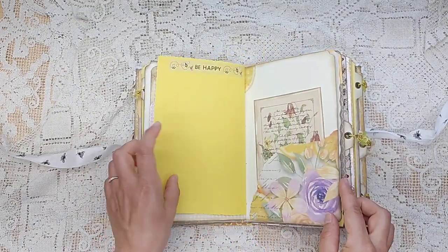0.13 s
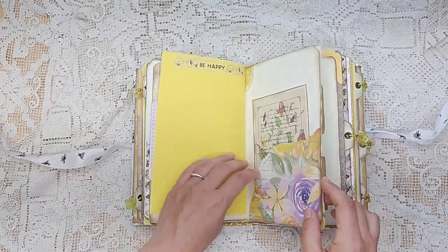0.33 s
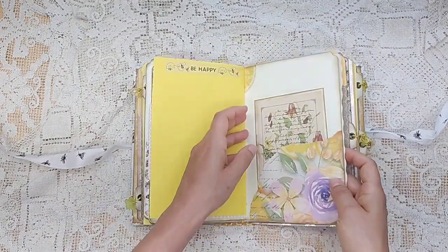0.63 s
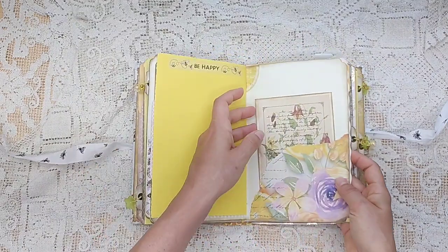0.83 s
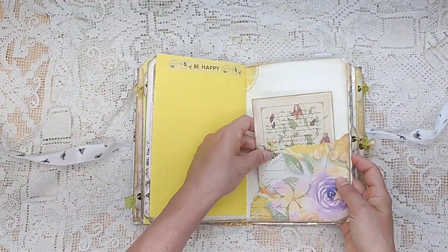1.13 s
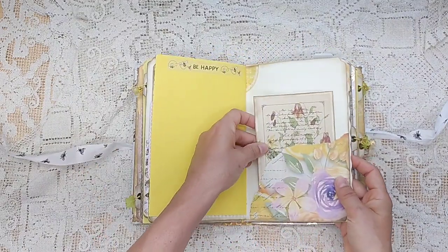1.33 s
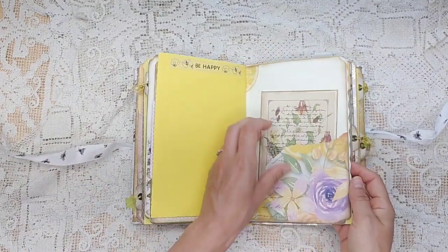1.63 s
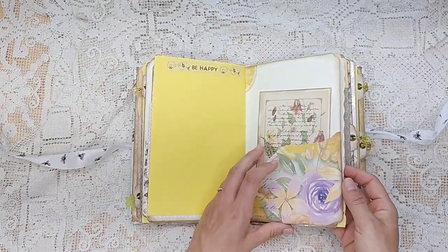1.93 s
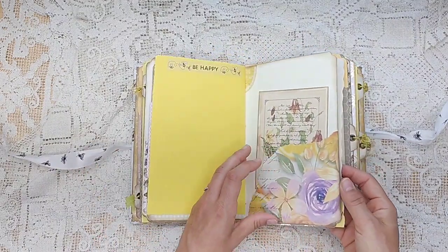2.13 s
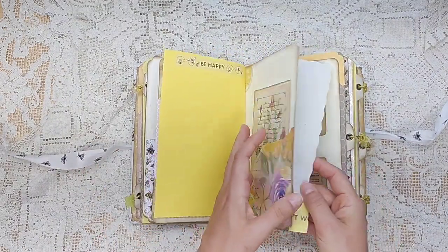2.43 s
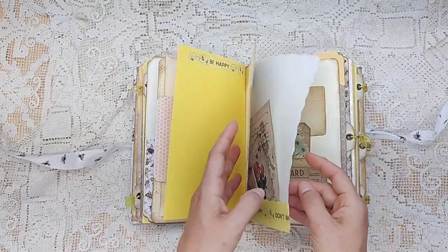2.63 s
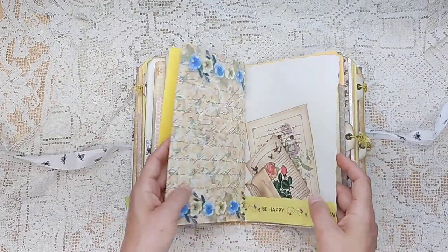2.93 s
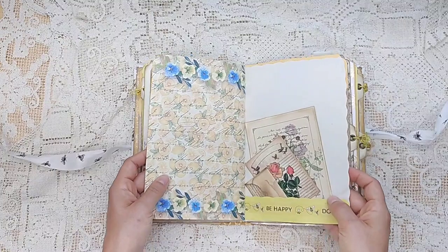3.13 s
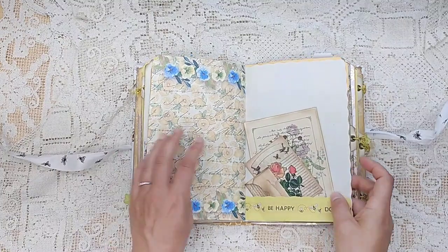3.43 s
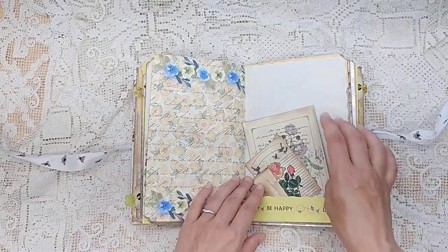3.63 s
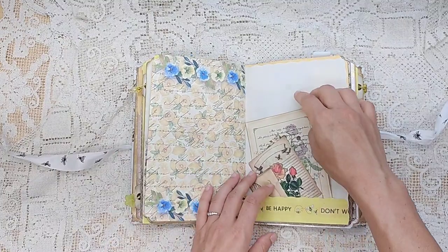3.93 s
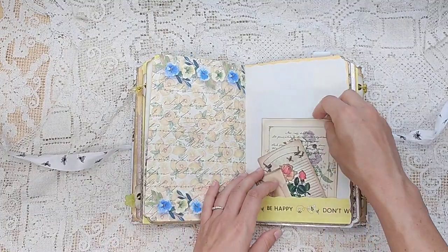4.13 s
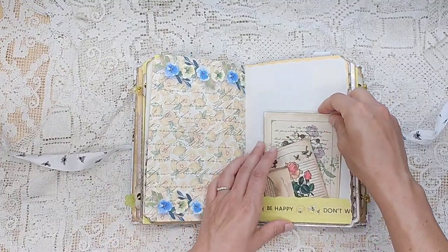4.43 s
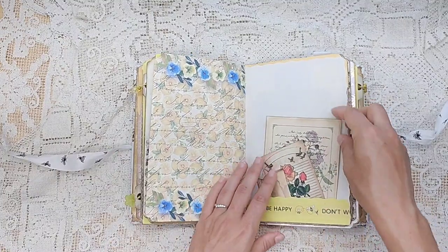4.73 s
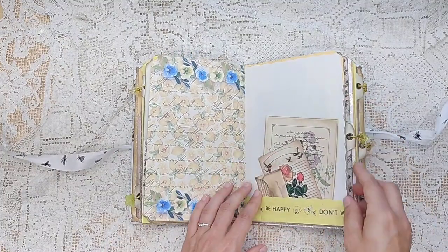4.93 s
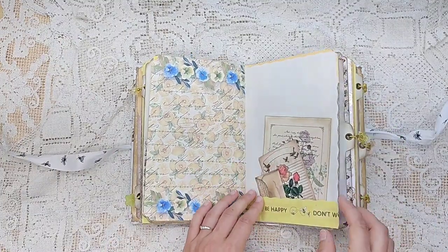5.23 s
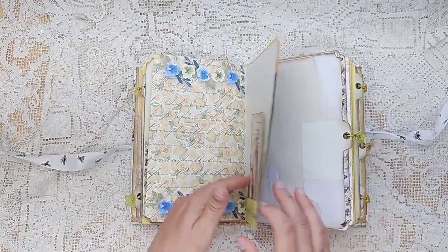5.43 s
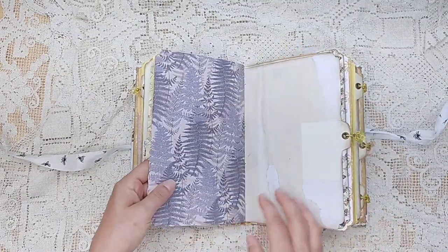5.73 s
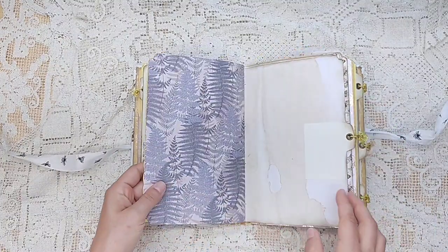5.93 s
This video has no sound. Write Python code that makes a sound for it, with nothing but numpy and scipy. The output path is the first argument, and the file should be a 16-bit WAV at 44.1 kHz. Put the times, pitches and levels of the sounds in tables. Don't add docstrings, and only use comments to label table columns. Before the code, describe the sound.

Close stereo phone pickup of thick, rough handmade pages on a cloth-covered table in a small soft room with faint low hum. From 0 to 0.9 seconds, fingertips rub and edges rasp, with a ringing squeaky slip at 0.3, scuffs and stiff snaps, and a low wobble of the nudged stand around 0.4 to 0.6. At 1.0 a stiff card flicks out with a hard, woody mid-range knock, followed by scrapes. Softer rubbing continues from 1.5, with small ticks at 2.0 and snaps at 2.3 to 2.45. At about 2.6 pages whip past the thumb in the loudest moment, a bright swish with dense crackle, over in a tenth of a second. Lighter scuffs and snaps follow from 2.8 to 3.6. From 3.7 to 5 a card slides quietly with sparse clicks, one snap near 4.8. After a near lull, a gentle turn brings soft snaps around 5.45 to 5.7, fading by 6.

```python
import sys
import numpy as np
from scipy import signal
from scipy.fft import rfft, irfft, next_fast_len
from scipy.io import wavfile
from scipy.ndimage import uniform_filter1d

SR = 44100
rng = np.random.default_rng(int(sys.argv[2]) if len(sys.argv) > 2 else 0)


def makeup_ratio(level_db):
    decades = np.asarray(level_db, float) / 20
    return 10 ** decades


def pcm_store(signal):
    levels = np.round(np.clip(np.atleast_2d(signal), -1, 1) * 32767)
    wavfile.write(sys.argv[1], SR, levels.astype(np.int16).T)


N = 268877
T = np.arange(N) / SR
F = np.fft.rfftfreq(next_fast_len(N), 1 / SR) + 1e-3

# peak in seconds [s], rise
# over 20 dB [s], fall over 20 dB [s], edge rasp level [dB], thrum of the page stack over the rasp [dB].
FINGERTIPS = [(.108, 0.08, -0.26, -46.5, -37), (.67, 0.16, 0.23, -50.5, -15.5),
              (1.57, 0.08, 0.18, -53.5, -8.5), (1.615, 0.08, 0.08, -54.5, -15),
              (1.755, -0.02, 0.1, -60, -4.5), (1.807, 0.2, 0.15, -63.5, -4.5),
              (2.077, 0.08, -0.07, -58, -3.5), (2.15, -0.2, -0.5, -72.5, -16),
              (2.91, -0.33, -0.5, -62, -10), (3.157, 0.06, -0.27, -56.5, -6), (3.3, -0.25, -0.5, -71, -10),
              (3.364, 0.06, 0.1237, -49, -7), (3.41, 0.11, 0.1, -54.5, -5), (3.675, 0.8, 0, -63, -4),
              (3.75, 0.19, 0.186, -68, -2), (4.0, 0.15, 0.54, -69.5, -1), (4.105, 0.11, 0.077, -64, -4),
                (4.26, 0.58, .022, -63, -12.5), (4.609, 0.057, 0.052, -60, -6.5),
                (4.679, 0.038, 0.052, -69.5, -3), (4.876, 0.23, 0.014, -63, -9.5),
                (4.978, 0.156, 0.15, -65, -1.5), (5.42, 0.032, 0.2, -71, -15),
                (5.466, 0.068, 0.043, -65.5, -0.5), (5.49, .08, .04, -71, -15.5),
                (5.545, 0.035, 0.056, -72.5, -4), (5.615, 0.11, 0.19, -67, -5),
                (5.709, 0.23, 0.11, -69.5, 0.5), (5.828, 0.087, 0.183, -65.5, -6.5),
                (6.041, 0.036, 0.038, -82, -2)]
# [s, s, s, dB, dB].
SHEET_STROKES = [(.305, 0.075, 0.1, -56.5, -6), (.542, 0.19, 0.12, -53.5, -11),
                 (.816, 0.17, 0.061, -64, 11), (.845, .04, 0.12, -57, -2), (.985, .025, 0.066, -63, 2.5),
                 (1.035, 0.017, 0.34, -57, -9), (1.291, .08, 0.15, -58, -6.5),
                 (1.43, 0.19, 0.64, -68.5, -8), (1.667, .1, 0.1, -59.5, -0.5),
                 (2.41, .015, 0.15, -65.5, -4), (2.46, 0.051, 0.6, -61.5, -2.5), (2.54, .3, 0.15, -66, -5),
                 (2.594, 0.29, .05, -54.5, -6), (2.616, 0.011, 0.045, -39.5, -7.5),
                 (2.888, 0.022, 0.089, -63, -0.5), (3.09, .25, 0.33, -68.5, 1),
                 (3.182, .021, 0.049, -67.5, 3), (3.27, .05, 0.29, -65, 3.5),
                 (5.176, 0.044, 0.026, -95, 22), (5.975, .05, 0.14, -85, 13.5)]
# [s, s, s, dB, dB].
EDGE_STROKES = [(.01, 0.07, .2, -58, -16), (.06, 0.12, 0.12, -51, -20.5), (.146, 0.05, 0.037, -44.5, -10.5),
                (.355, 0.043, 0.19, -47, -27), (.43, 0.06, 0.049, -56.5, -3.5),
                (1.08, 0.073, 0.11, -49.5, -8.5), (1.15, 0.11, 0.037, -48.5, -3.5),
                (2.0, .08, 0.37, -70.5, -14.5), (2.28, 0.09, .1, -73.5, -2.5),
                (2.335, 0.05, 0.016, -66, -5), (2.83, 0.011, 0.074, -58, -6.5),
                (3.005, 0.1, 0.063, -64, -10), (3.45, .1, 0.105, -58, -6), (3.49, 0.13, 0.11, -55, -7),
                (3.54, 0.14, 0.069, -49, -8), (3.866, 0.039, 0.038, -59.5, -10.5),
                (4.352, 0.063, 0.066, -54, -12.5), (4.505, 0.079, 0.023, -59.5, -6),
                (4.79, 0.067, 0.1, -60, -7.5)]
# [s, s, s, dB, dB].
WHIP_STROKES = [
    (2.638, 0.035, 0.033, -24.5, -20.5),
    (2.695, 0.064, 0.038, -45, -27.5),
]
# scrape over rasp [dB], share of the thrum that the scrape follows
# [ratio], hiss over rasp [dB].
FINGERTIP_VOICE = (-2.5, 0.34, -0.72)
SHEET_VOICE = (0.63, .25, -6.5)
EDGE_VOICE = (-4.5, 0.25, -5.5)
WHIP_VOICE = (24.5, 1.24, -18)
AT_REST_DB = -97.5

# frequency [Hz], width [Hz], level [dB].
SHEET_MODES = [(630, 45, -10), (1130, 21, 2.5), (1500, 17, 7.5), (2038, 52, 2.5), (2190, 31, -13.5),
               (2660, 150, -3), (3750, 5, -0.5), (4245, 11, -21.5), (5700, 110, -16), (6810, 310, -0.5),
               (7200, 210, -12.5), (9000, 160, -16)]
# frequency [Hz], density [dB per Hz].
RUB_COLOUR = [(88, -39.5), (150, 2), (226, -7), (494, -13), (578, -6), (905, -14), (1360, -9), (2060, -2),
              (3100, -7), (6640, -11), (16000, -15)]
BAND_EDGES_HZ = [280, 1200, 3200, 7000, 15000]
PATCH_SHARE_DB = [0, 3, 4, -1]

# start in seconds [s], peak level [dB], centre [Hz], decay time T60 [s].
SINGING = [(.292, -51, 1130, 0.2), (.317, -33.5, 2244, 0.25), (.328, -45, 4570, 0.15),
           (.488, -45.5, 2640, 0.13), (.841, -38, 6500, 0.044), (1.040, -51, 1580, 0.15),
           (1.067, -41, 1500, 0.23), (1.095, -50, 1560, 0.049), (1.629, -48, 588, 0.017),
           (2.066, -49.5, 6340, 0.05), (2.291, -31.5, 5660, 0.094), (2.418, -59, 5540, 0.047),
           (2.411, -43.5, 1260, 0.039), (2.826, -49, 7000, 0.058), (3.287, -47, 834, 0.098),
           (3.35, -38, 3800, 0.081), (4.234, -45, 7960, 0.043), (4.331, -51, 3600, 0.099),
           (4.6, -54, 7600, 0.077), (5.0, -51, 3990, 0.036)]
# [s, dB, Hz, s].
SCUFFS = [(.085, -34, 5670, 0.19), (.134, -37, 2140, 0.072), (.312, -38, 3600, 0.22),
          (.661, -39, 6470, 0.14), (.709, -43, 1940, 0.055), (.832, -45, 630, 0.077),
          (.903, -50, 553, 0.04), (1.143, -46, 1500, 0.12), (1.261, -51, 673, 0.12),
          (2.007, -40, 1196, 0.074), (2.505, -42, 3170, .17), (2.515, -45, 5610, 0.12),
          (2.548, -48, 4200, .13), (2.571, -40, 3960, 0.068), (2.994, -53, 3960, .08),
          (3.143, -57, 820, 0.045), (3.175, -50, 563, 0.04), (3.411, -42, 1080, 0.023),
          (3.533, -39.5, 3200, 0.06), (3.651, -55, 576, 0.051), (3.863, -68, 820, 0.058),
          (4.23, -60, 4040, .08), (4.498, -53.5, 1590, 0.032), (4.772, -60.5, 746, 0.035),
          (4.971, -50, 2035, 0.086), (5.422, -63.5, 1980, .041), (5.627, -49.5, 1707, 0.044),
          (5.839, -61.5, 1860, 0.11)]
# [s, dB, Hz, s].
FLIP = [
    (2.612, -28, 1290, 0.071),
    (2.619, -23.5, 7200, 0.11),
    (2.626, -19.5, 4280, 0.056),
    (2.622, -17, 2690, 0.079),
    (2.648, -26, 4000, 0.077),
]
# rise [s], width [octaves].
SINGING_SHAPE = (.0075, 0.19)
SCUFF_SHAPE = (0.0077, .62)
FLIP_SHAPE = (0.014, 0.59)

# start in seconds [s], peak level [dB], low ring [Hz],
# high ring [Hz], high ring over low ring [dB].
SNAPS = [(0.53, -36, 1460, 2190, 2.5), (0.774, -36, 670, 2020, -2.5), (0.799, -40, 680, 1980, -22),
         (1.115, -37, 1510, 1830, -21), (2.005, -42.5, 1140, 2000, -4), (2.295, -33, 1560, 3320, 8.5),
         (2.309, -36, 3300, 5600, -12), (2.414, -38.5, 560, 2640, 2), (2.44, -35, 1456, 2560, 1),
         (2.878, -44.5, 550, 1830, -2), (3.252, -49, 666, 2073, -5), (4.5, -46.5, 1012, 1946, -3),
         (4.672, -45.5, 1500, 4560, 8), (4.802, -36.5, 760, 1435, 3.5), (4.826, -44.5, 1160, 1790, -6),
         (5.163, -56.5, 567, 1814, 2), (5.456, -54.5, 435, 2080, -11), (5.536, -54, 370, 2960, 1),
         (5.629, -44.5, 553, 2100, 0.5), (5.68, -42, 590, 2100, 9), (5.981, -59, 365, 1650, 0.5)]
# [s, dB, Hz, Hz, dB].
PAGE_SNAPS = [
    (2.403, -32, 1300, 2520, 7.2),
    (3.142, -45, 711, 6500, 3),
    (3.236, -35, 653, 1870, 1.4),
]
SNAP_T60_S, PAGE_SNAP_T60_S = 0.04, 0.15

# start in seconds [s], peak level [dB], length of the push [s].
FLICK = (0.99, -16.5, .011)
# frequency [Hz], level [dB], decay time T60 [s].
CARD_RINGS = [(1546, 4.5, 0.022), (1560, -17, 0.086), (1830, -0.5, 0.035), (2100, 2, 0.034),
              (2533, 2, 0.033), (2783, -26, 0.08), (3600, -14, 0.04), (3960, -63, 0.35)]
# start in seconds [s], length [s], peak level [dB],
# note [Hz].
FOLDS = [(0.304, 0.069, -37.5, 3460), (0.997, 0.048, -38, 2294), (1.041, 0.068, -41, 1500),
         (1.072, 0.043, -50.5, 4430), (1.128, 0.048, -46, 1500), (1.137, 0.02, -46, 3770),
         (1.561, 0.063, -48.5, 4000), (1.579, 0.055, -47, 7060), (1.586, 0.048, -50, 1790),
         (2.294, 0.03, -50.5, 1490), (2.295, 0.032, -41, 4120), (2.408, 0.026, -51, 5750),
         (2.501, 0.15, -40, 3960), (2.497, 0.057, -43.5, 2900), (2.555, .05, -44, 5060),
         (2.55, 0.045, -44, 2770), (2.615, 0.036, -32, 1500), (2.754, 0.014, -62, 1450),
         (2.826, 0.035, -55.5, 3600), (2.608, 0.025, -34, 996), (2.9, 0.02, -59, 2820),
         (0.278, 0.13, -48, 4450), (3.24, 0.039, -45, 2100), (3.351, 0.051, -44, 5740),
         (3.533, 0.032, -45.5, 4140), (2.613, 0.014, -37, 527), (4.32, 0.038, -53, 3780),
         (0.656, 0.1, -51.5, 1500), (4.665, .025, -64.5, 7800), (5.584, 0.055, -60, 7450),
         (5.625, 0.02, -52.5, 4020), (6.032, 0.012, -68, 1206)]
# start in seconds [s], peak level [dB], frequency [Hz],
# length of ring [cycles].
TICKS = [(.1372, -41, 1910, 6), (.1455, -38.5, 2400, 4), (.315, -44, 2220, 5), (0.344, -39.5, 3400, 4),
         (0.6582, -43, 1500, 7), (.709, -47.5, 480, 4.6), (.774, -42.5, 2060, 27), (.8, -43, 646, 5),
         (.812, -44.5, 624, 8), (.835, -47, 554, 9), (1.1159, -40, 1570, 8), (2.009, -43, 1750, 14),
         (2.018, -38, 1150, 9), (2.031, -42, 1200, 10), (2.078, -50, 800, 4), (2.2955, -34.5, 3500, 3.3),
         (2.31, -48, 590, 6.7), (2.4038, -39.5, 2390, 2.3), (2.4155, -40, 510, 4), (2.4402, -32, 1470, 4),
         (2.447, -37.5, 1500, 7), (2.515, -40.5, 2980, 4), (2.5654, -40, 3950, 4), (2.5704, -38, 4050, 8),
         (2.602, -36.5, 1100, 12), (2.616, -30.5, 1020, 5), (2.6286, -19, 3100, 5.3),
         (2.6353, -18, 2630, 5), (2.641, -14.5, 3200, 4.4), (2.647, -17.5, 2250, 6),
         (2.654, -23.5, 2297, 6), (2.66, -22, 2150, 8), (2.682, -29, 2400, 6.6), (3.143, -47.5, 890, 4),
         (3.239, -43, 2010, 40), (3.178, -51, 560, 10), (3.264, -43.5, 750, 4), (3.354, -44, 620, 5),
         (3.384, -43.5, 620, 6), (3.415, -42, 1110, 6), (3.49, -44.5, 600, 5), (3.5365, -38, 3280, 6),
         (3.5635, -44.5, 600, 3.2), (4.5, -42, 1000, 3), (4.5035, -44, 1300, 4), (4.673, -53.5, 4750, 25),
         (4.82, -43.5, 1100, 5), (4.828, -46, 897, 4), (5.6308, -46, 450, 2.6), (5.681, -50, 600, 4),
         (5.692, -53, 700, 6)]

# time in seconds [s], left minus right [dB].
HANDS = [(0.0, 1), (0.8, -0.6), (1.71, 0.5), (2.1, -1.5), (2.8, -1), (3.02, 1), (3.14, -1.5), (4.3, 2.5),
         (6.1, -0.5)]
# frequency [Hz], left minus right [dB].
PORT_BALANCE = [(60, -5.5), (110, 8), (200, 1), (380, 1), (700, -3), (1290, -1), (2380, -1.5), (4400, -5),
                (8120, 3), (15000, 3.5)]
PORT_LAG, LAG_SCATTER = 3.24, 2.18
ECHO_S = [.00043, .00107, .0019, .0031]

# time in seconds [s], level [dB].
STAND = [(0.35, -88), (0.385, -60.5), (.41, -58), (0.432, -64), (0.455, -53), (.5, -60.5), (.53, -61),
         (0.58, -69), (0.646, -68.5), (0.675, -79)]
# start in seconds [s], level [dB], swing [Hz].
SETTLING = [
    (.765, -61, 34.1),
    (.93, -62.5, 40),
    (1.728, -57.5, 36),
    (1.828, -59, 40),
]
# frequency [Hz], density [dB per Hz].
HUM = [(12, -25.5), (25, -2.5), (50, -8), (125, -7.5), (200, -21.5), (400, -22.5), (1000, -27.5),
       (2000, -29.5), (4000, -34), (7500, -45.5), (11000, -39), (16000, -38)]


def unit(x):
    return x / np.sqrt(np.mean(x ** 2))


def table(rows, hz):
    f, v = np.transpose(rows)
    return np.interp(np.log(hz), np.log(f + 1), v)


def shape(x, gain):
    size = next_fast_len(N)
    return irfft(rfft(x, size) * gain, size)[..., :N]


def walk(rate):
    hold = int(SR / rate)
    steps = np.repeat(rng.standard_normal(N // hold + 1), hold)
    return 1.34 * uniform_filter1d(steps, hold)[:N]


def fibres(count, spread_db):
    size_db = spread_db * np.minimum(rng.exponential(size=count), 4)
    return unit(rng.standard_normal(count) * makeup_ratio(size_db))


def ring(x, hz, width):
    b, a = signal.iirpeak(min(hz, .45 * SR), hz / width, fs=SR)
    return signal.lfilter(b, a, x)


def patch(push, hz, octaves, modes_db):
    width = octaves * hz
    wide = ring(ring(ring(push, hz, width), hz, width), hz, 1.1 * width)
    spots = hz * 2 ** (.4 * octaves * np.clip(rng.standard_normal(3), -2, 2))
    narrow = 2.0 * ring(push, hz, hz / 40.0) + sum(ring(push, f, f / 9.0) for f in spots)
    return unit(wide) + makeup_ratio(modes_db) * unit(ring(narrow, hz, 2.0 * width))


def ports(x, place):
    size = next_fast_len(len(x))
    lag = PORT_LAG + LAG_SCATTER * place
    turn = np.exp(1j * np.pi * np.arange(size // 2 + 1) / size * lag)
    return irfft(rfft(x, size) * np.array([turn, 1 / turn]), size)[:, :len(x)]


def lay(out, k, db, burst, place):
    out[:, k:k + len(burst)] += ports(burst * makeup_ratio(db) / np.abs(burst).max(), place)


def add(out, s, db, burst):
    lay(out, int(s * SR), db, burst, rng.standard_normal())


def contact_db():
    power = np.full((4, N), makeup_ratio(2 * AT_REST_DB))
    kinds = [(FINGERTIPS, FINGERTIP_VOICE), (SHEET_STROKES, SHEET_VOICE),
             (EDGE_STROKES, EDGE_VOICE), (WHIP_STROKES, WHIP_VOICE)]
    for strokes, (scrape_db, share, hiss_db) in kinds:
        for s, rise, fall, db, thrum_db in strokes:
            rise, fall = max(rise, .012), max(fall, .012)
            near = slice(max(int((s - 3 * rise) * SR), 0), int((s + 3 * fall) * SR))
            swell_db = db - 20 * np.maximum((s - T[near]) / rise, (T[near] - s) / fall)
            bands_db = np.c_[[thrum_db, scrape_db + share * thrum_db, 0, hiss_db]]
            power[:, near] += makeup_ratio(2 * (swell_db + bands_db))
    return 10 * np.log10(power)


def rubbing(ring_db=0.0, flicker_db=1.24, patchy_db=4.5, sharpness=32.):
    levels = contact_db()
    modes = 1 + sum(makeup_ratio(ring_db + 0.9 * db) / (1 + 1j * (F - hz) / w) for hz, w, db in SHEET_MODES)
    shared, places = walk(55), 0
    for lo, hi, db, share_db in zip(BAND_EDGES_HZ, BAND_EDGES_HZ[1:], levels, PATCH_SHARE_DB):
        limits = np.sqrt((1 + (lo / F) ** 8) * (1 + (F / hi) ** 8))
        grain = shape(fibres((3, N), spread_db=2.5), makeup_ratio(table(RUB_COLOUR, F)) * modes / limits)
        flares = np.zeros((3, N))
        for k, hz in enumerate(np.geomspace(1.03 * lo, .95 * hi, num=15)):
            flares[k % 3] += makeup_ratio(patchy_db * walk(30)) * ring(grain[k % 3], hz, hz / sharpness)
        contact = unit(grain) + makeup_ratio(share_db) * unit(flares)
        flicker = flicker_db * (1.4 * shared + .5 * walk(60))
        places = places + 0.65 * unit(contact) * makeup_ratio(db + flicker)
    return sum(makeup_ratio(-3.0 * abs(k - 1)) * ports(x * makeup_ratio(1.6 * walk(180)), k - 1) for k, x in enumerate(places))


def slips(skirt_db=-22):
    out, t = np.zeros((2, N + SR)), np.arange(SR // 4) / SR
    kinds = [(SINGING, SINGING_SHAPE), (SCUFFS, SCUFF_SHAPE), (FLIP, FLIP_SHAPE)]
    for rows, (rise, octaves) in kinds:
        for s, db, hz, t60 in rows:
            fade = makeup_ratio(-60 * np.maximum(t - rise, 0) / max(t60, .005))
            push = np.minimum(t / rise, 1) ** 2 * fade * fibres(len(t), spread_db=1.5)
            skirt = makeup_ratio(skirt_db) * unit(ring(push, 1800.0, 4000.))
            add(out, s, db, patch(push, hz, octaves, modes_db=13.0) + skirt)
    return out[:, :N]


def snaps(crack_db=5, crack_s=0.0021, body_db=-10, top_db=-20):
    out, t = np.zeros((2, N + SR)), np.arange(SR // 4) / SR
    for rows, t60 in [(SNAPS, SNAP_T60_S), (PAGE_SNAPS, PAGE_SNAP_T60_S)]:
        for s, db, low_hz, high_hz, high_db in rows:
            crack = 1 + makeup_ratio(crack_db) * np.exp(-t / crack_s)
            blow = np.minimum(t / 0.00066, 1) * crack * makeup_ratio(-60 * t / t60)
            push = blow * fibres(len(t), spread_db=-6.5)
            low = patch(push, low_hz, .7, modes_db=-2.0)
            high = makeup_ratio(high_db) * patch(push, high_hz, .8, modes_db=2.0)
            stack = makeup_ratio(body_db) * patch(push, 520., 1.6, modes_db=3.5)
            top = makeup_ratio(high_db + top_db) * unit(ring(push, 4500., 6000.))
            add(out, s, db, low + high + stack + top)
    return out[:, :N]


def flick(thud_db=-15.0):
    out, t = np.zeros((2, N + SR)), np.arange(SR // 4) / SR
    s, db, length = FLICK
    push = np.sin(np.pi * np.minimum(t / length, 1)) ** 2 * rng.standard_normal(len(t))
    push = signal.lfilter(*signal.butter(6, 2750., fs=SR), push)
    card = 0
    for hz, ring_db, t60 in CARD_RINGS:
        card = card + makeup_ratio(ring_db) * unit(ring(ring(push, hz, hz / 2), hz, 4.1 / min(t60, .06)))
    add(out, s, db, card + makeup_ratio(thud_db) * patch(push, 660.0, 0.65, modes_db=-13.0))
    return out[:, :N]


def folds(octaves=.14):
    out, t = np.zeros((2, N + SR)), np.arange(SR // 6) / SR
    for s, length, db, hz in FOLDS:
        swell = np.sqrt(np.sin(np.pi * np.minimum(t / length, 1)).clip(0))
        add(out, s, db, patch(swell * fibres(len(t), spread_db=2.0), hz, octaves, modes_db=4.0))
    return out[:, :N]


def ticks(click_db=-10.5):
    out, t = np.zeros((2, N + SR)), np.arange(SR // 30) / SR
    for s, db, hz, cycles in TICKS:
        fade = np.exp(-3.0 * t * hz / max(cycles, 1))
        jolt = np.sin(2 * np.pi * hz * t) * fade * np.minimum(t * hz / 1.2, 1)
        click = ring(1. * (t == 0), 1.6 * hz, 2 * hz)
        burst = (unit(jolt) + makeup_ratio(click_db) * unit(click)) * (1 - t / t[-1])
        lay(out, int(s * SR) - 32, db, np.pad(burst, 32), 0)
    return out[:, :N]


def scatter(x, feedback=0.36, from_hz=1800, level_db=-4):
    gain = makeup_ratio(level_db) / np.sqrt(1 + (from_hz / F) ** 4)
    for late in np.exp(-2j * np.pi * np.outer(ECHO_S, F)):
        gain = gain * (late - feedback) / (1.5 - feedback * late)
    return shape(x, gain) * np.c_[[1, -1]]


def stand():
    s, db = np.transpose(STAND)
    swing = np.sin(2 * np.pi * np.cumsum(45. * (1 + .09 * walk(25))) / SR)
    rumble = unit(ring(ring(rng.standard_normal(N), 85.0, 60.), 85.0, 60.))
    return (4.0 * swing + 1.1 * rumble) * makeup_ratio(np.interp(T, s, db, -120, -120))


def settling(t60=0.11):
    out = np.zeros(N)
    for s, db, hz in SETTLING:
        fade = (T > s) * makeup_ratio(-60 * np.abs(T - s) / t60 / 2)
        out += makeup_ratio(db) * np.sin(2 * np.pi * hz * (T - s)) * fade
    return out


def room(x, t60=0.088, level_db=-8, top_hz=5430, alike_under_hz=900):
    t = np.arange(SR // 3) / SR
    tails = rng.standard_normal((2, len(t))) * makeup_ratio(-60 * t / t60) * np.minimum(t / 0.0017, 1)
    tails = signal.lfilter(*signal.butter(1, top_hz, fs=SR), tails)
    tails += signal.lfilter(*signal.butter(1, alike_under_hz, fs=SR), tails[::-1] - tails) / 2
    return np.array([signal.fftconvolve(x, h / np.linalg.norm(h))[:N] for h in tails]) * makeup_ratio(level_db)


def duck(paper, over_db=-53.5, share=.5, average_s=0.087):
    keep = np.exp(-1 / (SR * average_s))
    power = signal.lfilter([1 - keep], [1, -keep], paper ** 2)
    return (1 + power / makeup_ratio(2 * over_db)) ** (-share / 2)


def hum(gain, level_db=-67):
    mid, side = (shape(rng.standard_normal(N), makeup_ratio(table(HUM, F))) for _ in range(2))
    side = shape(side, np.clip(F / 280.0, .22, .95))
    tone = makeup_ratio(level_db + walk(6.4)) * np.array([mid + side, mid - side]) / np.std(mid)
    bass = shape(tone, 1 / (1 + (F / 740.0) ** 2))
    return bass + gain * (tone - bass)


def scene():
    paper = rubbing() + slips() + snaps() + flick() + folds() + ticks()
    lean = makeup_ratio(table(PORT_BALANCE, F) / 2)
    pan_db = np.interp(T, *np.transpose(HANDS)) / 2
    left = shape(paper[0], lean) * makeup_ratio(pan_db)
    right = shape(paper[1], 1 / lean) * makeup_ratio(-pan_db)
    around = scatter(paper[0]) + room(paper[1])
    return np.array([left, right]) + around + stand() + settling() + hum(duck(paper[0]))


def roll_off(x):
    return signal.sosfilt(signal.butter(12, 15830, fs=SR, output="sos"), x)


def record(dry):
    return roll_off(dry)


dry = scene()
out = record(dry)
pcm_store(out)
```